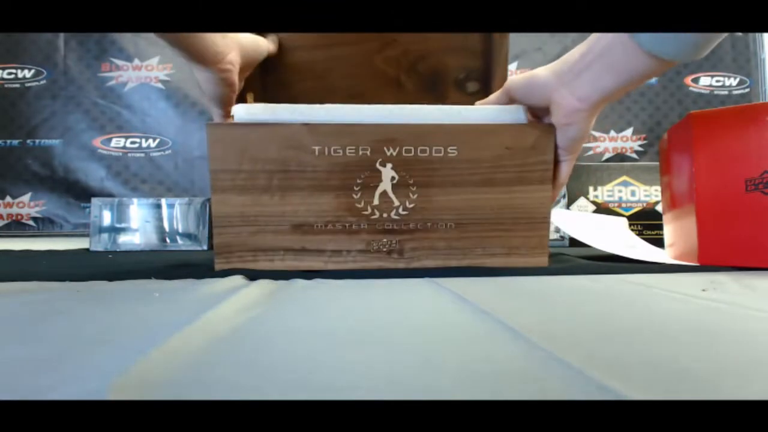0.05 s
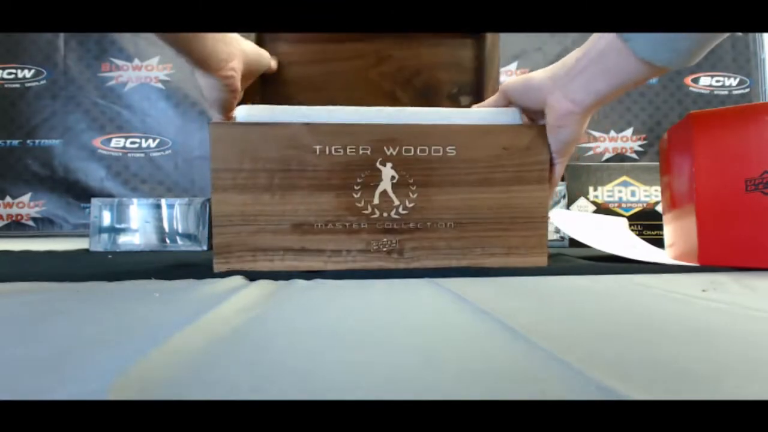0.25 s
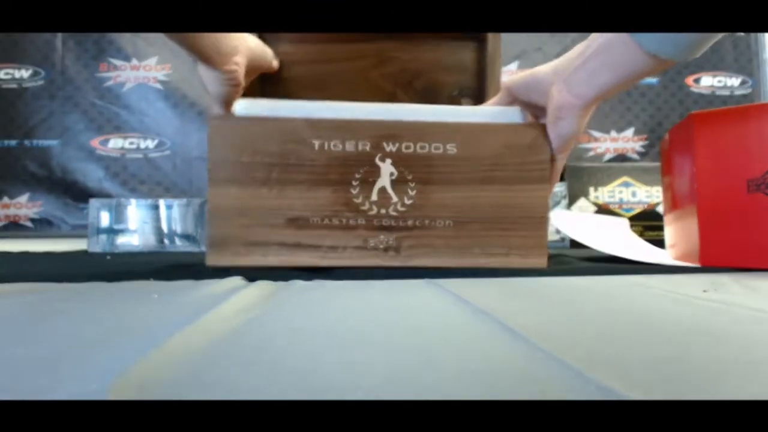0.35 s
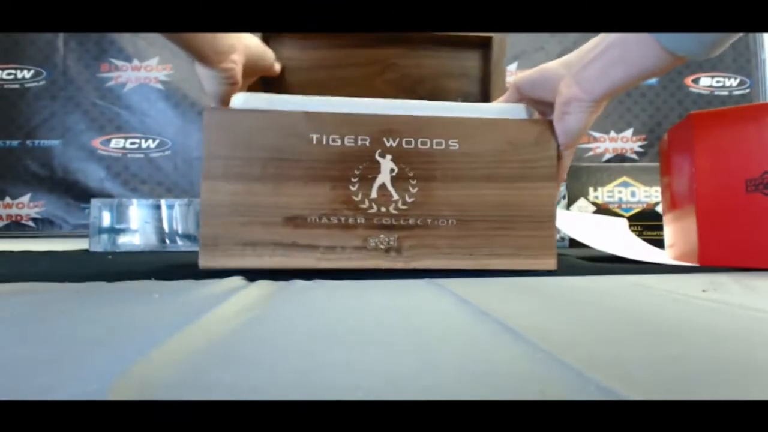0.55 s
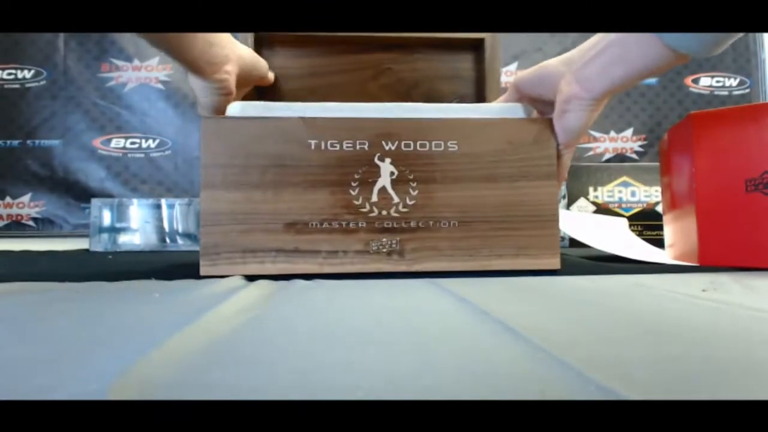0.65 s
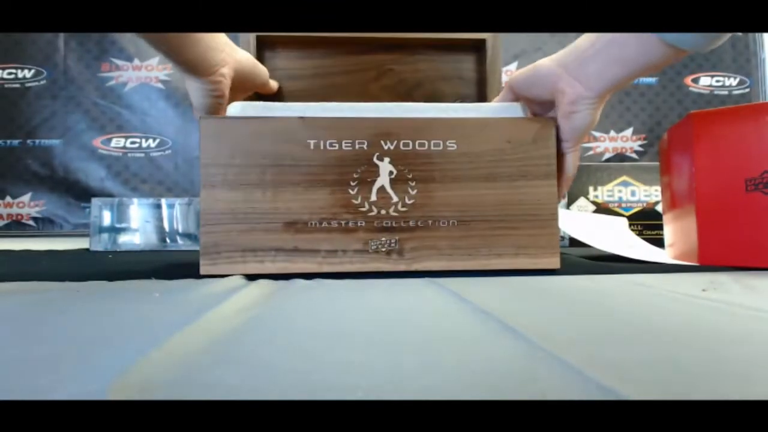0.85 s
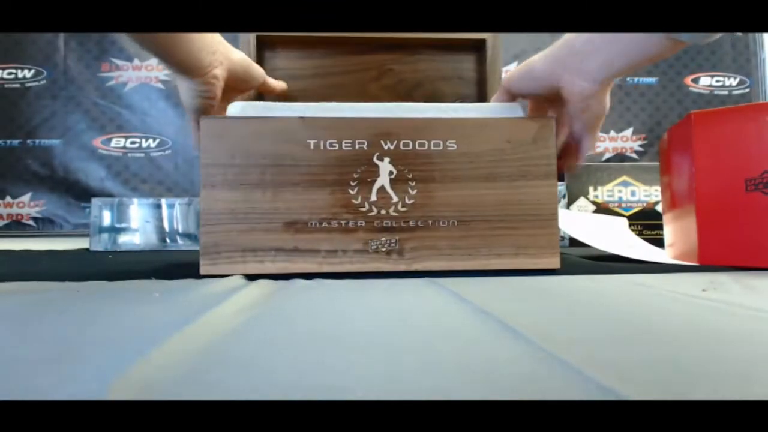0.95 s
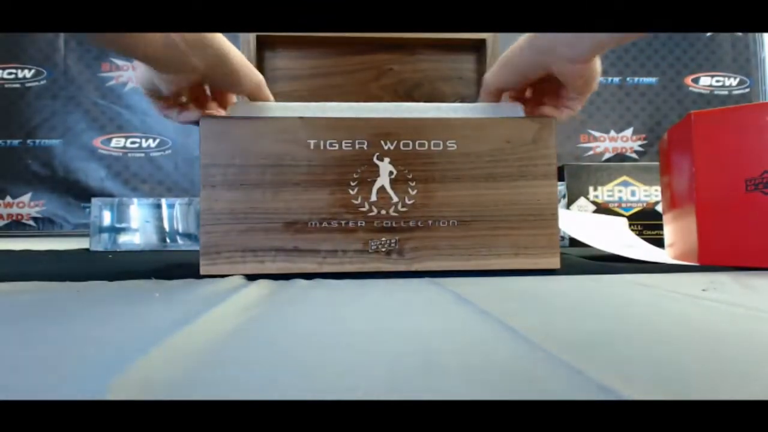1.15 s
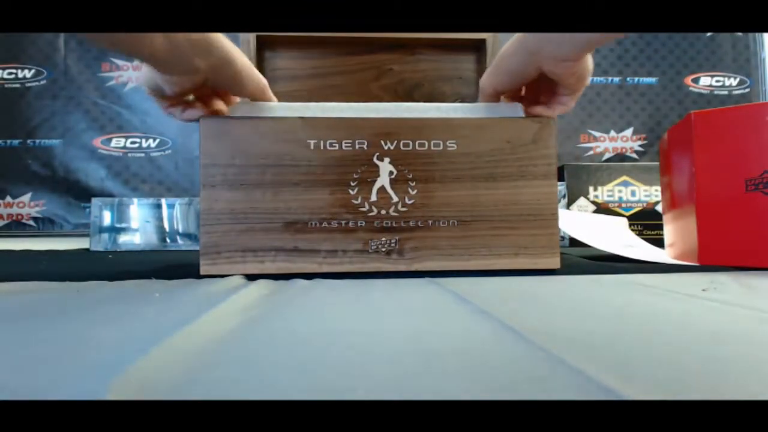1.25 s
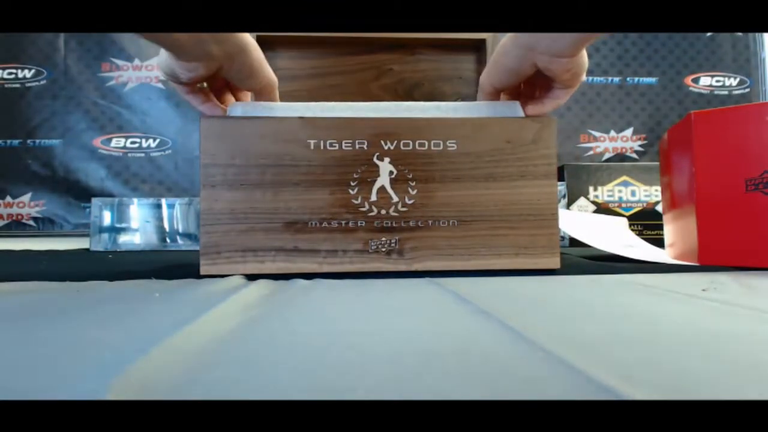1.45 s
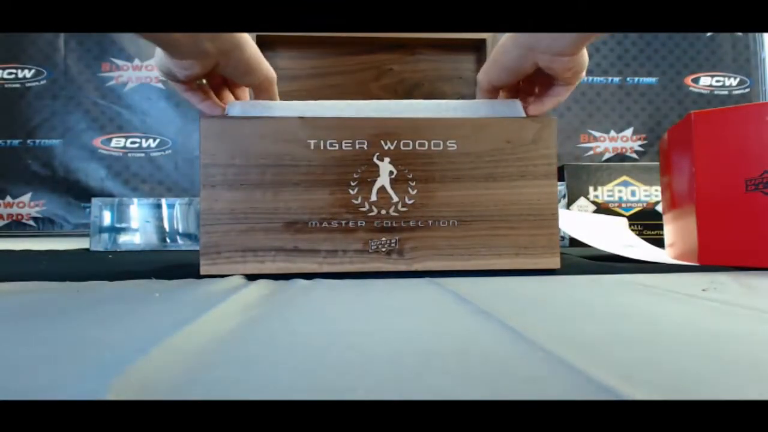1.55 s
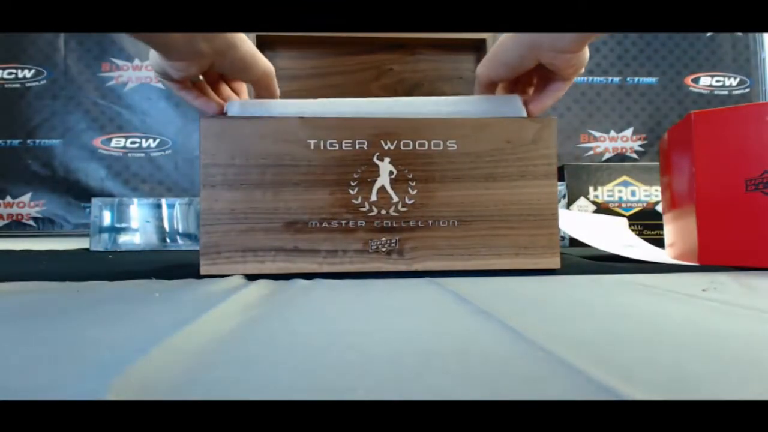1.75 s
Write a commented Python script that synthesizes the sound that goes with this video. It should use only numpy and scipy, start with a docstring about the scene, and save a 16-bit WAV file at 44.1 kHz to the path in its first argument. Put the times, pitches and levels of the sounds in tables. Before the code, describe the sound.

A wooden box is set down with a dull knock on a cloth-covered table, fingers shuffling

```python
"""Throughout: steady room noise, and a table swaying under the microphone with a low handling rumble.
From 0.16 s, fingers slide (noise grains) and tick (decaying noise) on a wooden box; the table gives (sines).
First knocks are faint; at 0.72-0.83 s the box edges land on a cloth-covered table as one dull knock
(contact pulses ringing box modes), and a small fitting clinks (short bright modes).
At 1.18 s skin squeaks faintly (narrow-band noise); slides and ticks go on. The box sounds get a short tail."""
import sys
import numpy as np
from scipy import signal
from scipy.fft import rfft, irfft
from scipy.io import wavfile
from scipy.ndimage import uniform_filter1d

SR = 44100
rng = np.random.default_rng(int(sys.argv[2]) if len(sys.argv) > 2 else 0)


def generate_wav(sig):
    """Save sig (samples, or channels by samples) to the path in sys.argv[1] as 16-bit PCM at SR."""
    pcm = np.round(np.clip(np.atleast_2d(sig).T, -1, 1) * 32767).astype(np.int16)
    wavfile.write(sys.argv[1], SR, pcm)


N = 79380


def amp(db):
    """Decibels to gain."""
    return 10 ** (np.asarray(db) / 20)


def unit(x):
    """Scales to rms 1."""
    return x / np.sqrt(np.mean(x ** 2) + 1e-20)


def noise(n):
    """White Gaussian noise, n samples."""
    return rng.standard_normal(n)


def seconds(n):
    """Time axis of n samples, s."""
    return np.arange(n) / SR


def read(points, hz):
    """Interpolates a table on a log-frequency axis."""
    f, value = np.transpose(points)
    return np.interp(np.log(hz + 1), np.log(f), value)


def level(points):
    """Gain curve from (t, dB) points, smoothed over 900 samples."""
    gain = amp(np.interp(seconds(N), *np.transpose(points)))
    return uniform_filter1d(gain, size=900)


def colour(x, points, tilt_db_per_oct=0):
    """Filters x by a table plus a tilt, then scales to rms 1."""
    hz = np.fft.rfftfreq(len(x), 1 / SR)
    gain = amp(read(points, hz) + tilt_db_per_oct * np.log2(hz + 1))
    return unit(irfft(rfft(x) * gain, len(x)))


def add(mix, start_s, sound):
    """Mixes a sound in at start_s, cut at the end of the mix."""
    part = mix[max(round(start_s * SR), 0):][:len(sound)]
    part += sound[:len(part)]


# room noise colour: f/Hz, relative level/dB
ROOM_COLOUR = [(20, -5), (90, 4.5), (130, -10.5), (200, 0.5), (300, -7.5), (450, -9), (700, -8),
               (1050, -3.5), (1480, -3.5), (1800, -15.5), (2400, -21), (3500, -28), (6000, -34.5),
               (10000, -37.5), (15500, -39)]
ROOM_RMS_DB = -50


def room():
    """Steady rush of a small room: stationary coloured noise."""
    return amp(ROOM_RMS_DB) * colour(noise(N), ROOM_COLOUR)


# table sway: t/s, rms level/dB
SWAY = [(0, -26), (.08, -28.5), (.14, -33.5), (.25, -27.5), (.31, -15), (.37, -19), (.45, -26), (.58, -30),
        (.68, -27.5), (.74, -12), (.81, -11.5), (.87, -17), (.94, -35), (1.02, -21.5), (1.11, -21.5),
        (1.22, -33.5), (1.36, -28), (1.41, -45), (1.46, -27), (1.55, -36), (1.8, -31.5)]
SWAY_HZ, SWAY_WANDER_RMS = 18, 0.061  # wander as a fraction of SWAY_HZ
# handling rumble: t/s, rms level/dB
RUMBLE = [(.12, -56.5), (.19, -38.5), (.3, -43.5), (.42, -43.5), (.55, -50.5), (.67, -45), (.73, -29),
          (.8, -33), (.88, -46), (.96, -55.5), (1.16, -51.5), (1.28, -49.5), (1.34, -89), (1.44, -56),
          (1.55, -57), (1.7, -57)]
# rumble colour: f/Hz, relative level/dB
RUMBLE_COLOUR = [(10, -17.5), (33, -1.5), (52, 0), (100, -5), (200, -17.5), (350, -27), (600, -37),
                 (1200, -94)]


def table():
    """The table sways at a wandering low frequency and passes on handling rumble as low noise."""
    wander = unit(np.convolve(noise(60), np.hanning(9), "valid"))
    points = np.arange(len(wander))
    wander = np.interp(np.linspace(0, len(wander) - 1, N), points, wander)
    hz = SWAY_HZ * (1 + SWAY_WANDER_RMS * wander)
    sway = np.sqrt(2) * level(SWAY) * np.sin(2 * np.pi * np.cumsum(hz) / SR)
    rumble = level(RUMBLE) * colour(noise(N), RUMBLE_COLOUR)
    return sway + rumble


# slides of skin and cloth on wood: t/s, length/s, level/dB, tilt/(dB/octave)
SLIDES = [(0.159, .19, -54, -2.5), (0.359, 0.078, -50.5, -4), (.395, 0.079, -53, -1.1),
          (0.474, 0.19, -52, -1.6), (0.679, 0.077, -54.5, -0.4), (0.859, 0.067, -55.5, -4),
          (1.15, 0.18, -57.5, -3), (1.58, .115, -57, 4), (1.752, 0.097, -59.5, 3.5)]
# slide colour: f/Hz, relative level/dB
SLIDE_COLOUR = [(150, -1.5), (400, -13.5), (1400, 7.5), (1900, 0), (2450, -1.5), (3400, -14), (4400, -5.5),
                (5800, -15.5), (7500, -14.5), (11000, -20.5), (15000, -32.5)]
GRAINS_PER_S, GRAIN_SPREAD_DB = 6000, 3.5
SMOOTH_GAIN = 0.95  # smooth noise relative to the grains


def slide(length_s, db, tilt_db_per_oct):
    """Many tiny slips of random size swell and fade under one stroke."""
    size = amp(GRAIN_SPREAD_DB * np.minimum(rng.exponential(1, N), 5))
    hits = rng.random(N) < GRAINS_PER_S / SR
    slips = unit(size * noise(N) * hits)
    friction = colour(slips + SMOOTH_GAIN * noise(N), SLIDE_COLOUR, tilt_db_per_oct)
    u = np.arange(0, length_s, 1 / SR) / length_s
    return amp(db) * friction[:len(u)] * np.sin(np.pi * u)


# soft pushes on the table: t/s, level/dB, f/Hz, swell time/s
BUMPS = [(0.175, -21.5, 51.9, 0.02), (0.241, -33.5, 50.5, 0.012), (0.374, -45, 187, 0.018),
         (.58, -51, 109, 0.037), (0.699, -14.5, 49.2, 0.013), (.762, -16.5, 80, 0.011),
         (.827, -22.5, 106.4, .007), (1.262, -51, 190.7, 0.013)]


def bump(db, hz, swell_s):
    """The table top gives and springs back: a sine whose envelope peaks at swell_s."""
    t = seconds(SR // 3)
    u = t / swell_s
    envelope = u ** 2 * np.exp(2 * (1 - u))
    return amp(db) * envelope * np.sin(2 * np.pi * hz * t)


# fingers and loose lid clicking: t/s, level/dB, decay/s, tilt/(dB/octave)
TICKS = [(.1755, -42, 0.01, -1.2), (.29, -68, .002, -3), (0.3541, -44.5, 0.0089, -2.5),
         (.3625, -39.5, 0.0049, -2.3), (0.556, -66, .002, -7), (0.7347, -52, 0.015, 2),
         (1.618, -47, 0.0015, 18)]
# click colour: f/Hz, relative level/dB
TICK_COLOUR = [(200, -17), (400, 0), (620, 6), (850, -12.5), (1350, 7.5), (2000, 0), (3000, -6.5),
               (3450, -6), (3850, -10), (4400, 3), (5600, -18), (7500, -16), (10000, -27), (15000, -40)]


def tick(db, decay_s, tilt_db_per_oct):
    """A light hard contact dies quickly in the dense upper modes of wood: decaying noise."""
    t = seconds(SR // 8)
    burst = colour(noise(len(t)), TICK_COLOUR, tilt_db_per_oct)
    return amp(db) * burst * np.exp(-t / decay_s)


# knocks on the box: the first two give finger ticks a woody body, the rest are box edges touching down: t/s,
# level/dB (halved in gain below), contact time/s, bass cut f/Hz
KNOCKS = [(.1765, -48.5, 0.00074, 150), (.354, -34.5, 0.0011, 596), (.7243, -18.5, 0.0007, 1160),
          (.729, -17.5, 0.0023, 283), (0.7364, -25.5, .0005, 406), (0.7676, -15.5, 0.0017, 80),
          (.7795, -12.5, 0.00274, 110), (.8293, -14, 0.002, 71)]
# box modes: f/Hz, relative level/dB, t60/s
BOX_MODES = [(114.5, 2, 0.095), (144, -3.5, 0.15), (183.3, -7.5, 0.14), (227.6, -7, 0.066),
             (256, -10, 0.057), (352.6, -6, 0.12), (512, -12.5, 0.043), (580, -9, 0.077),
             (768, -3.5, 0.061), (870, -9, 0.044), (1050, -3.5, 0.017), (1194, -1.5, 0.04),
             (1316, -24, 0.03)]
THUD_DB, THUD_DECAY_S = -14, .009  # relative to the modes
CLOTH_HZ = 1310  # the cloth muffles the blows above this


def knock(db, contact_s, bass_cut_hz):
    """A cushioned blow rings the box panels: the longer the contact, the duller."""
    t = seconds(SR // 2)
    ring = sum(amp(d - 60 * t / t60) * np.cos(2 * np.pi * hz * t) for hz, d, t60 in BOX_MODES)
    top_mode_hz = BOX_MODES[-1][0]
    low_pass = signal.butter(6, top_mode_hz, fs=SR, output="sos")
    thud = unit(signal.sosfilt(low_pass, noise(len(t)))) * np.exp(-t / THUD_DECAY_S)
    push = np.sin(np.pi * np.arange(0, contact_s, 1 / SR) / contact_s) ** 2
    body = signal.fftconvolve(ring + amp(THUD_DB) * thud, push / push.sum())
    panel = signal.butter(2, bass_cut_hz, "high", fs=SR, output="sos")
    cloth = signal.butter(10, CLOTH_HZ, fs=SR, output="sos")
    return -amp(db) * signal.sosfilt(cloth, signal.sosfilt(panel, body)) / 2


# modes of a small hard fitting: f/Hz, relative level/dB, t60/s
FITTING_MODES = [(3510, -1.5, 0.016), (4340, -0.5, 0.019), (4920, -7, 0.022), (6480, -2.5, 0.016),
                 (7250, -5, 0.013), (8150, -4, 0.011)]
CLINK_START_S, CLINK_DB = .7787, -49.5


def clink(db):
    """A small hard fitting clicks as the box lands: short bright modes, alternating in sign."""
    t = seconds(SR // 20)
    ring = np.zeros(len(t))
    for k, (hz, d, t60) in enumerate(FITTING_MODES):
        ring += (-1) ** k * amp(d - 60 * t / t60) * np.sin(2 * np.pi * hz * t)
    return amp(db) * ring


SQUEAK_START_S, SQUEAK_LENGTH_S = 1.178, .05
SQUEAK_DB, SQUEAK_HZ, SQUEAK_HALF_WIDTH_HZ = -61, 3330, 110


def squeak(length_s, db, hz, half_width_hz):
    """Skin sticks and slips at an unsteady pitch: narrow-band noise."""
    f = np.fft.rfftfreq(N, 1 / SR)
    band = 1 / (1 + ((f - hz) / half_width_hz) ** 4)
    tone = unit(irfft(rfft(noise(N)) * band, N))
    swell = np.hanning(round(length_s * SR))
    return amp(db) * tone[:len(swell)] * swell


# reverberation decay: f/Hz, t60/s
TAIL = [(100, 0.18), (500, 0.114), (2000, 0.3), (8000, .12)]
TAIL_DB = -10.5


def reverberation(x):
    """A short diffuse tail: noise with each band dying at its own speed."""
    hz, t, bands = signal.stft(noise(SR // 2), SR, nperseg=256)
    decay = amp(-60 * t / read(TAIL, hz)[:, None])
    tail = signal.istft(bands * decay, SR)[1]
    return amp(TAIL_DB) * signal.fftconvolve(x, tail / np.linalg.norm(tail))[:N]


def scene():
    """Box and pushes with their tail, plus table and room; one channel."""
    box = np.zeros(N)
    for source, rows in ((slide, SLIDES), (bump, BUMPS), (tick, TICKS), (knock, KNOCKS)):
        for start_s, *settings in rows:
            add(box, start_s, source(*settings))
    add(box, CLINK_START_S, clink(CLINK_DB))
    add(box, SQUEAK_START_S, squeak(SQUEAK_LENGTH_S, SQUEAK_DB, SQUEAK_HZ, SQUEAK_HALF_WIDTH_HZ))
    return (box + reverberation(box) + table() + room())[None]


EDGE_HZ = 15720


def record(dry):
    """Band limit of the recorder: linear-phase low-pass at EDGE_HZ."""
    padded = np.pad(dry, ((0, 0), (255, 255)), "reflect", reflect_type="odd")
    low_pass = signal.firwin(511, EDGE_HZ, window=("kaiser", 9), fs=SR)
    return signal.oaconvolve(padded, low_pass[None], "valid")


dry = scene()
out = record(dry)
generate_wav(out)
```